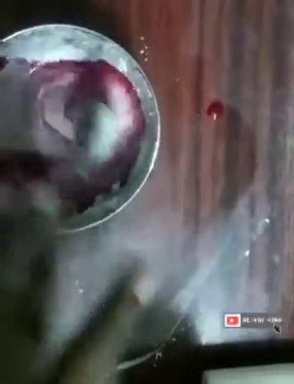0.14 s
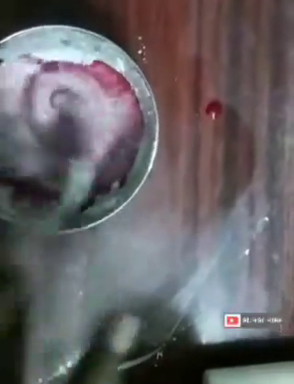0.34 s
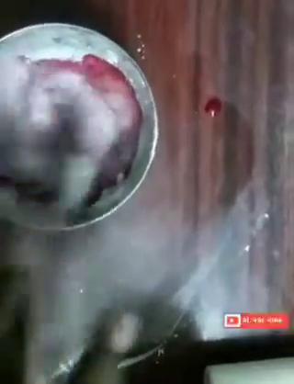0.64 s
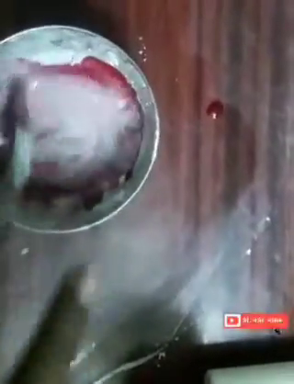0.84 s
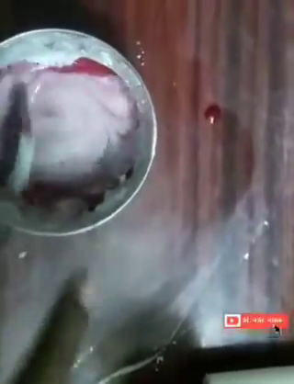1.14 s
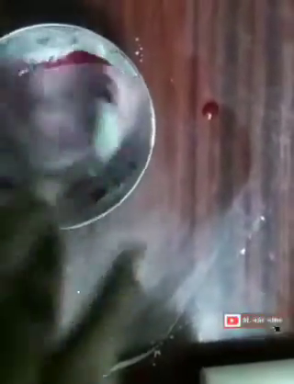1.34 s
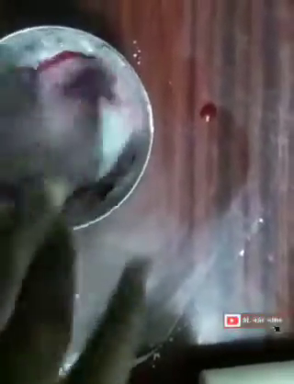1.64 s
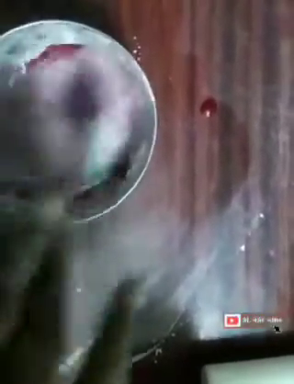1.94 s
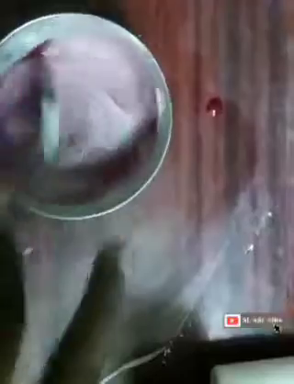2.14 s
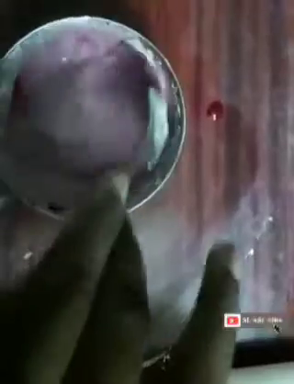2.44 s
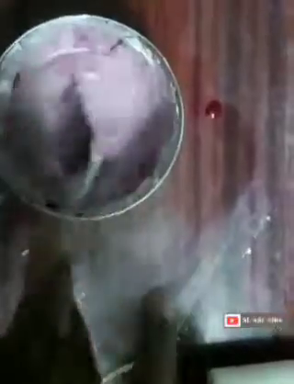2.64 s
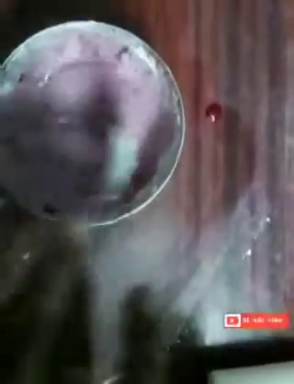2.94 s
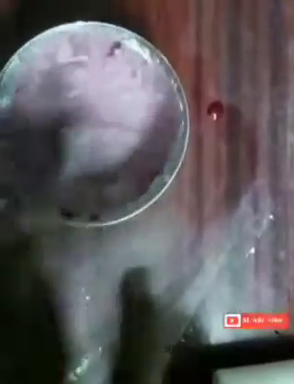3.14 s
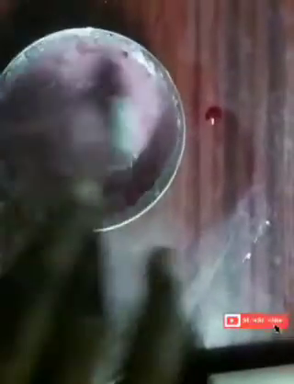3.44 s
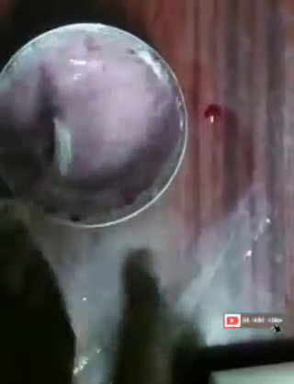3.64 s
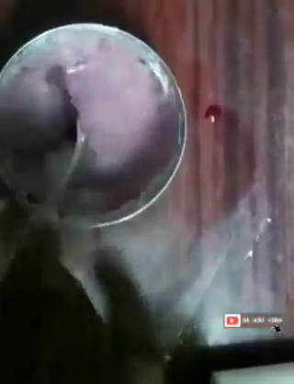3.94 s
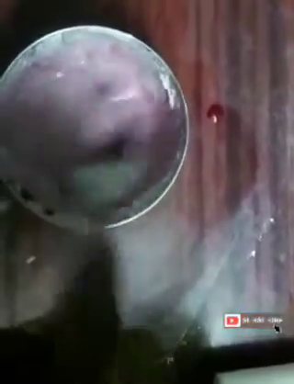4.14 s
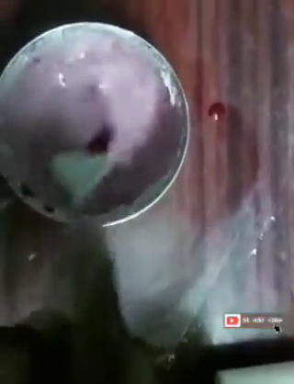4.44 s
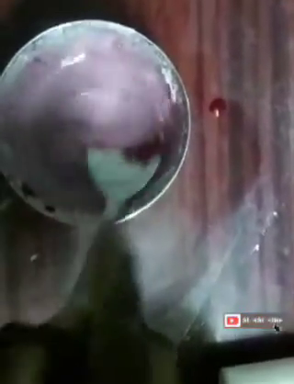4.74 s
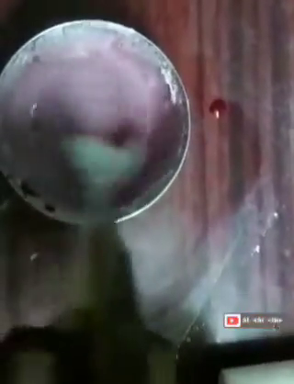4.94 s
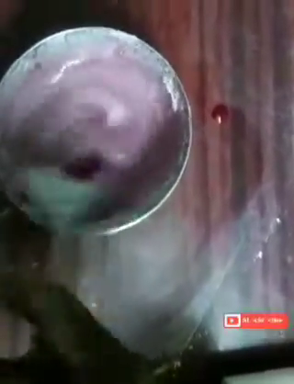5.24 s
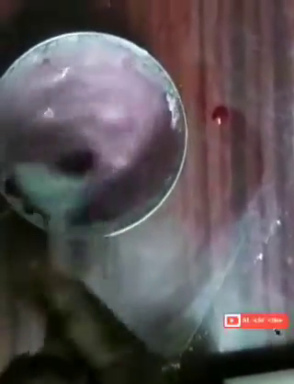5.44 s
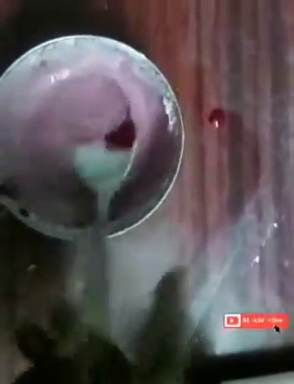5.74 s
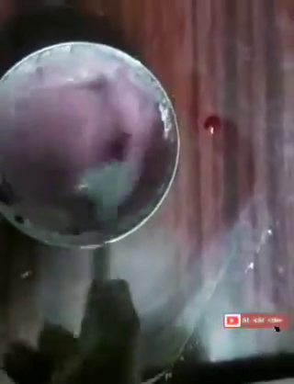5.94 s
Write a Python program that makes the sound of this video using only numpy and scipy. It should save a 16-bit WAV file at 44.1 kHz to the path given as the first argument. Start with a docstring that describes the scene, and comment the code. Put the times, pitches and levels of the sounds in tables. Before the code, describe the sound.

Quick irregular stirring in a paint-filled metal bowl: dull clinks, light ticks and brief rough scrapes, with soft thuds through a wooden table.

```python
"""Stirring paint in a steel bowl

A plastic spoon stirs thick paint in a small steel bowl on a wooden table, close to one of two microphone ports.
The spoon taps the wall: short contacts ring the paint-damped bowl, its rim and the table top.
Between taps it scrapes along the wall, as random stick-slip impulses through the same modes, and snaps free.
The steel rings softly after two late taps. A small room answers with decaying noise tails,
over a faint mains hum (a wavering sine) and hiss (filtered noise)."""
import sys
import numpy as np
from scipy import signal
from scipy.fft import rfft, irfft, next_fast_len
from scipy.io import wavfile
from scipy.ndimage import uniform_filter1d, map_coordinates

SR = 44100
rng = np.random.default_rng(int(sys.argv[2]) if len(sys.argv) > 2 else 0)


def how_loud(loudness_db):
    """Turn decibels into a plain amplitude multiplier (0 dB gives 1, 20 dB gives 10)."""
    steps = np.asarray(loudness_db, float) / 20
    return 10 ** steps


def store_wav(level_fs):
    """Save 16-bit WAV to argv[1]."""
    pcm = np.round(np.clip(np.atleast_2d(level_fs), -1, 1) * 32767)
    wavfile.write(sys.argv[1], SR, pcm.T.astype(np.int16))


N = 268128  # length in samples
RING = 4096  # samples kept of each blow


def unit(x):
    """Scale to rms 1."""
    return x / np.sqrt(np.mean(x ** 2) + 1e-20)


def along(points, hz):
    """(Hz, value) points read on a log frequency axis, held flat beyond the ends."""
    f, v = np.transpose(points)
    return np.interp(np.log(hz + 1), np.log(f + 1), v)


def wobble(rate):
    """A smooth random curve, rate knots a second."""
    knots = rng.standard_normal(int(N * rate / SR) + 4)
    return map_coordinates(knots, [np.arange(N) * rate / SR])


def filtered(x, response):
    """x times a complex response of frequency."""
    m = next_fast_len(x.shape[-1] + 8192)
    spectrum = rfft(x, m) * response(np.fft.rfftfreq(m, 1 / SR))
    return irfft(spectrum, m)[..., :x.shape[-1]]


def resonant(modes):
    """Causal response of a body with (Hz, width, dB) modes, their signs alternating."""
    def response(f):
        return sum((-1) ** k * how_loud(db) * 1j * f * width / (hz * hz - f * f + 1j * f * width)
                   for k, (hz, width, db) in enumerate(modes))
    return response


def struck(modes, contact_s, rough, spread_db, detune):
    """One blow of peak 1: a short contact rings the modes, shifted by where the paint clings."""
    t = np.arange(RING) / SR
    force = t * np.exp(-t / contact_s) * (1 + rough * rng.standard_normal(len(t)))
    luck = rng.standard_normal((len(modes), 2))
    here = [(hz * (1 + detune * a), width, db + spread_db * b)
            for (hz, width, db), (a, b) in zip(modes, luck)]
    ring = filtered(force, resonant(here))
    return ring / np.abs(ring).max()


# Modes of the paint-damped bowl. Each row: pitch in Hz, width in Hz, relative level in dB.
BOWL_MODES = [(860, 72, -5), (1150, 193, -5), (1712, 202, -6), (1912, 115, 2.5), (2280, 285, -2),
              (2590, 130, -3), (3258, 510, -2), (4254, 272, 0), (5120, 820, -6)]


def favoured(spot_hz, narrow_db):
    """The bowl's modes as fed from a spot that favours one pitch, narrow_db down per octave squared."""
    return [(hz, width, level - narrow_db * np.log2(hz / spot_hz) ** 2) for hz, width, level in BOWL_MODES]


# High modes of the rim. Each row: pitch in Hz, width in Hz, relative level in dB.
RIM_MODES = [(6100, 2570, -9), (7740, 820, 2), (8398, 433, 2.5), (13000, 6900, -12)]
# Modes of the wooden table top. Each row: pitch in Hz, width in Hz, relative level in dB.
TABLE_MODES = [(78, 28, -12.5), (164, 7.5, -7.5), (272.6, 21.8, 0.5), (373.8, 17.5, -8), (445.6, 55, -16.5),
               (668.6, 43, -9)]
# Spoon taps on the wall. Each row: start in seconds, clack peak in dB, rim tick in dB against the clack,
# favoured pitch in Hz, table thud peak in dB.
SPOON_TAPS = [(0.025, -25.5, -26, 1880, -30), (0.244, -27, 5, 2000, -39), (0.298, -39, -20, 900, -33),
              (0.5848, -15, -4.5, 1800, -26), (0.644, -23.5, -13, 1680, -32),
              (0.7067, -17, -3.5, 3500, -50), (0.721, -4.5, -19.5, 3100, -50),
              (0.817, -22.5, -19, 1890, -32.5), (0.891, -5, -35.5, 1950, -23),
              (1.0735, -24.5, 5, 840, -43.5), (1.124, -17.5, -15, 1880, -29.5),
              (1.146, -13, -21, 1730, -24.5), (1.2941, -12, -9, 2700, -38), (1.4043, -18, -2, 3300, -29.5),
              (1.5315, -4, -30, 2500, -25.5), (1.705, -15.5, -47, 1890, -31), (1.799, -9, -12.5, 2300, -26),
              (1.8472, -5, -19.5, 2300, -29), (1.8724, -19.5, -5.5, 1150, -37),
              (2.0145, -16.5, -7, 860, -35.5), (2.125, -30.5, 9.5, 1720, -32), (2.371, -22, -2, 1260, -30),
              (2.578, -23.5, 3.5, 1780, -30.5), (2.629, -29.5, 20, 2130, -37),
              (2.6474, -25.5, 10.5, 3250, -45), (2.6894, -19, 2.5, 1060, -30),
              (2.846, -9.5, 2, 3700, -33.5), (2.863, -31.5, -19, 860, -23.5),
              (2.948, -23.5, 10.5, 3500, -31.5), (3.0658, -23.5, 20.5, 2050, -29),
              (3.3388, -3.5, -11.5, 2920, -37), (3.4448, -14.5, -30, 1860, -28.5),
              (3.488, -23.5, -3, 2030, -56), (3.5314, -12.5, -18.5, 1800, -31),
              (3.6315, -17.5, 6.5, 3360, -31.5), (3.8047, -18.5, 0, 2400, -47),
              (3.9969, -19.5, -2, 2000, -29), (4.192, -19, 2.5, 1640, -28),
              (4.4076, -21.5, 14.5, 1390, -32.5), (4.621, -20, 4.5, 1240, -41),
              (4.7021, -20.5, 1, 1830, -34.5), (4.9203, -23.5, 5.5, 1800, -40.5),
              (5.1388, -22.5, 7, 4760, -54), (5.254, -22.5, 4.5, 1900, -67),
              (5.2971, -10.5, -4, 3030, -33.5), (5.5137, -19, 6, 1500, -41),
              (5.6134, -29, -10, 1400, -38.5), (5.837, -26.5, 7, 1150, -70)]
# The spoon's edge snaps free of the wall with a light tick. Each row: start in seconds, peak in dB.
SNAP_TICKS = [(0.280, -13.5), (0.881, -13), (1.3666, -31), (1.6594, -12), (1.6856, -15), (3.6433, -18.5),
              (4.466, -26), (4.716, -30), (4.841, -21.5), (4.860, -21.5), (4.876, -22.5), (5.104, -24),
              (5.277, -41)]
PRE_SWELL_S = 0.0015  # time constant of the noise swell heard ahead of a tap


def taps():
    """Each tap clacks in the bowl, ticks in the rim and thuds in the table: rows (steel, wood)."""
    out = np.zeros((2, N + RING))
    for s, db, tick_db, spot_hz, thud_db in SPOON_TAPS:
        bowl = favoured(spot_hz, narrow_db=8.0)
        clack = struck(bowl, contact_s=0.00003, rough=0.16, spread_db=4.0, detune=0.033)
        tick = struck(RIM_MODES[:-1], contact_s=0.00094, rough=9, spread_db=5.0, detune=0.039)
        thud = struck(TABLE_MODES, contact_s=0.00032, rough=0.26, spread_db=2, detune=0.033)
        blow = np.array([how_loud(db) * (clack + how_loud(tick_db) * tick), how_loud(thud_db) * thud])
        out[:, round(s * SR):][:, :RING] += blow
    for s, db in SNAP_TICKS:
        snap = struck(BOWL_MODES[5:] + RIM_MODES, contact_s=0.001, rough=7.8, spread_db=9.5, detune=0.061)
        out[0, round(s * SR):][:RING] += how_loud(db) * snap
    for s, db, tick_db, *_ in SPOON_TAPS:  # a short noise swell leads into each tap
        lead = np.arange(min(round(s * SR), 400))  # samples before the tap
        swell = how_loud(db + max(tick_db, 0) - 22.5) * np.exp(-lead / (PRE_SWELL_S * SR))
        out[0, round(s * SR) - lead] += swell * rng.standard_normal(len(lead))
    return out[:, :N]


# The hand bears down while whipping and lightens later. Each row: time in seconds, grit level in dB against the drag.
HAND_GRIT = [(0, -1), (4.2, -0.5), (6.08, -8)]


def hand(s):
    """The hand's grit level in dB at time s."""
    return np.interp(s, *np.transpose(HAND_GRIT))


# Strokes along the wall. Each row: start in seconds, length in seconds, drag level in dB.
WALL_STROKES = [(0.0, 0.11, -40), (0.057, 0.17, -36), (0.139, 0.17, -43), (0.24, 0.18, -41),
                (0.343, 0.22, -35.5), (0.505, 0.17, -35), (0.666, 0.13, -31.5), (0.753, 0.1, -39.5),
                (0.835, 0.14, -36), (0.965, 0.11, -34.5), (1.116, 0.088, -36), (1.178, 0.18, -37.5),
                (1.462, 0.12, -33.5), (1.564, 0.12, -38), (1.679, 0.075, -47), (1.788, 0.12, -35.5),
                (1.92, 0.15, -29.5), (2.129, 0.27, -42.5), (2.227, 0.16, -31.5), (2.358, 0.035, -32),
                (2.407, 0.12, -51), (2.601, 0.12, -31), (2.838, 0.03, -28.5), (3.055, 0.069, -36.5),
                (3.137, 0.12, -31.5), (3.341, 0.31, -45.5), (3.426, 0.049, -38.5), (3.596, 0.11, -37),
                (3.71, 0.08, -43.5), (3.769, 0.13, -39), (3.891, 0.12, -32), (4.015, 0.11, -46.5),
                (4.198, 0.1, -33.5), (4.403, 0.095, -40.5), (4.623, 0.067, -36.5), (5.058, 0.04, -33.5),
                (5.242, 0.097, -38.5), (5.618, 0.078, -33.5), (5.651, 0.34, -44), (5.793, 0.083, -39)]
GRIP_S = 0.0014  # rise of a stroke that lands with a tap
PRESS_ON, EASE_OFF = 0.33, 0.51  # shares of a stroke spent rising and falling
FULLNESS = 0.66  # exponent bending the rise and fall


def pressure():
    """Each stroke presses on, holds and eases off, overlaps adding as power: gains of (drag, grit)."""
    power, landings = np.zeros((2, N)), np.array(SPOON_TAPS)[:, 0]
    for s, length, drag_db in WALL_STROKES:
        u = np.arange(round(length * SR)) / (length * SR)  # 0 to 1 through the stroke
        nearest = landings[np.abs(landings - s).argmin()]
        landed = abs(nearest - s) < 0.018
        rise = u * length / GRIP_S if landed else u / PRESS_ON  # a spoon that lands with a tap grips at once
        press = np.minimum(1, np.minimum(rise, (1 - u) / EASE_OFF)) ** FULLNESS
        gains = how_loud(drag_db) * press * how_loud([[0], [hand(s)]])
        part = power[:, round((nearest if landed else s) * SR):][:, :len(u)]
        part += gains[:, :part.shape[1]] ** 2
    return np.sqrt(power)


def grit(per_s, size_db, clump_db):
    """Tiny stick-slip impulses of uneven size, coming in clumps."""
    slip = rng.random(N) < per_s / SR
    size = how_loud(size_db * np.minimum(rng.exponential(size=N), 4)) * rng.standard_normal(N)
    return unit(slip * size * how_loud(clump_db * wobble(60)))


def patchy(x, depth_db):
    """The contact spot moves, so the modes are fed unevenly from moment to moment."""
    z = signal.stft(x, nperseg=256)[2]
    across_pitch = uniform_filter1d(rng.standard_normal(z.shape), size=5, axis=0)
    field = uniform_filter1d(across_pitch, size=9, axis=1)
    return unit(signal.istft(z * how_loud(depth_db * unit(field)), nperseg=256)[1][:N])


SOFT_SPOT_HZ, HARD_SPOT_HZ = 1825, 3560  # pitch favoured by light and by hard strokes
BRIGHT_DRAG_DB, BRIGHT_RANGE_DB = -36.5, 5  # drag about which the scrape turns brighter, and over what range
RUMBLE_DB = 7  # table gain under a stroke


def scrape():
    """The same slips drive bowl and rim; sparser ones of their own drive the table: rows (steel, wood)."""
    drag, fizz = pressure()
    slips = grit(per_s=5000, size_db=2.8, clump_db=3)
    soft = unit(filtered(slips, resonant(favoured(SOFT_SPOT_HZ, narrow_db=1.5))))
    hard = unit(filtered(slips, resonant(favoured(HARD_SPOT_HZ, narrow_db=1.5))))
    drag_db = 20 * np.log10(drag + 1e-9)
    # the share can reach 2: above 1 the soft spot is subtracted
    share = 1 / (0.5 + np.exp((BRIGHT_DRAG_DB - drag_db) / BRIGHT_RANGE_DB))
    bowl = patchy((1 - share) * soft + share * hard, depth_db=4.5)
    rim = patchy(unit(filtered(slips, resonant(RIM_MODES))), depth_db=3.5)
    table_slips = drag * grit(per_s=1500, size_db=0.0, clump_db=5.0)
    table = filtered(table_slips, resonant(TABLE_MODES))
    return np.array([drag * bowl + fizz * rim, how_loud(RUMBLE_DB) * table])


# The bowl rings free when the hand lets go. Each row: start in seconds, level in dB.
RELEASES = [(5.511, -44), (5.618, -46)]
# Partials of the free bowl. Each row: pitch in Hz, level in dB against the release, time in seconds to fall 60 dB.
FREE_PARTIALS = [(381.2, 1.5, 0.36), (1316, 9.5, 0.069), (1890, 9, 0.2)]


def free_ring():
    """A soft, wavering ring of the steel after two late taps: decaying sines with a brief onset."""
    t = np.arange(N) / SR
    waver_db = 3 * wobble(35)
    out = np.zeros(N)
    for s, db in RELEASES:
        since = np.maximum(t - s, 0)
        onset = 1 - np.exp(-since / 0.0073)
        for hz, level, t60 in FREE_PARTIALS:
            decay = how_loud(db + level + waver_db - 60 * since / t60)
            out += decay * onset * np.sin(2 * np.pi * hz * since)
    return out


# Decay of the small room. Each row: frequency in Hz, time in seconds to fall 60 dB.
ROOM_DECAY = [(300, 0.38), (2000, 0.19), (12000, 0.15)]


def room(x):
    """Each frequency of the noise tail dies at its own speed; a new tail every third of a second."""
    out, step, long = np.zeros((2, N + SR)), SR // 3, SR // 2
    for i in range(0, N, step):
        hz, t, z = signal.stft(rng.standard_normal((2, long)), SR, nperseg=256)
        fade = how_loud(-60 * t / along(ROOM_DECAY, hz)[:, None])
        tail = signal.istft(z * fade, SR, nperseg=256)[1][:, :long]
        wet = signal.fftconvolve(x[None, i:i + step], tail / np.linalg.norm(tail[0]), axes=1)
        out[:, i + 130:][:, :wet.shape[1]] += wet  # the tail starts 130 samples late
    return out[:, :N]


# Spectrum of the hiss at the near port. Each row: frequency in Hz, relative density in dB per Hz.
HISS_SHAPE = [(30, -33), (68, -10), (109, -9.5), (157, -25), (430, -19), (780, -39.5), (7000, -41.5),
              (8150, -29), (9300, -42), (16000, -53.5)]
# Hiss of the near port over the far one. Each row: frequency in Hz, difference in dB.
HISS_NEAR_OVER_FAR = [(60, 17.5), (950, 3.5), (6000, 21), (15000, -8.5)]


def hiss_and_hum():
    """Room hiss with rumble shared by both ports, and an unsteady hum: rows (near, far)."""
    def share(hz):
        return 0.9 / (1 + (hz / 200) ** 2)
    near, other = filtered(rng.standard_normal((2, N)), lambda hz: how_loud(along(HISS_SHAPE, hz)))
    far = filtered(near, share) + filtered(other, lambda hz: np.sqrt(1 - share(hz) ** 2))
    far = filtered(far, lambda hz: how_loud(-along(HISS_NEAR_OVER_FAR, hz)))
    hiss = np.array([near, far]) / np.std(near)
    hum = how_loud(-63 + 2.5 * wobble(30)) * np.sin(2 * np.pi * 99 * np.arange(N) / SR)
    return how_loud(-60.0) * hiss + hum * how_loud([[0], [-11]])


# Far port against the near one, for close sound. Each row: frequency in Hz, gain in dB.
FAR_PORT = [(250, -8), (500, -2), (1000, -7.5), (2000, -12), (4000, -12.5), (8000, -17.5), (15000, -2.5)]


def scene():
    """Steel reaches the far port later, thuds reach both ports at once; the room reaches both: rows (near, far)."""
    steel, wood = taps() + scrape()
    wood = wood + free_ring()
    lag = SR * (0.00019 + 0.0001 * wobble(11))  # the extra path changes as the spoon goes round
    late = map_coordinates(steel, [np.arange(N) - lag])
    far = filtered(late + wood, lambda hz: how_loud(along(FAR_PORT, hz)))
    wet = room(steel + how_loud(-6) * wood)
    wet_near = how_loud(-9.5) * wet[0]
    wet_far = filtered(wet[1], lambda hz: how_loud(1.26 * along(FAR_PORT, hz)))
    return np.array([steel + wood + wet_near, far + wet_far]) + hiss_and_hum()


def roll_off(x):
    """The treble ends steeply here."""
    return signal.sosfilt(signal.butter(12, 17000, fs=SR, output="sos"), x)


def record(dry):
    """The recorder clips at full scale, lifts the sound by 2 dB and cuts steeply above 15.7 kHz."""
    clipped = np.clip(dry, -1, 1)
    mix = filtered(clipped, lambda hz: how_loud(along([(15700, 2.0), (16000, -40.0)], hz)))
    return roll_off(mix)


dry = scene()
out = record(dry)
store_wav(out)
```